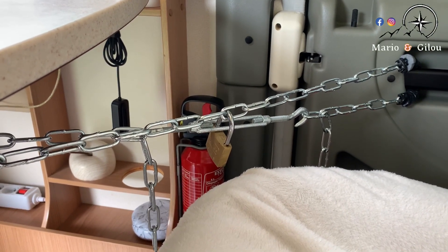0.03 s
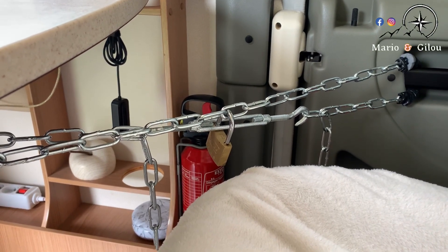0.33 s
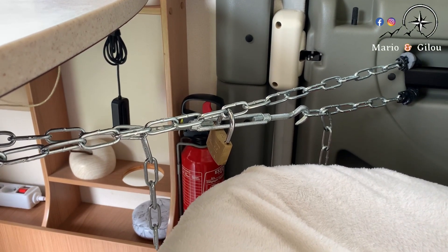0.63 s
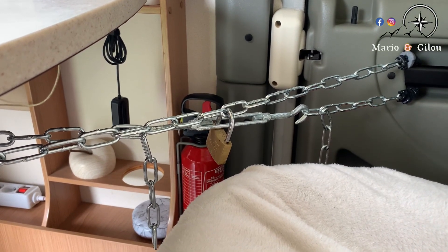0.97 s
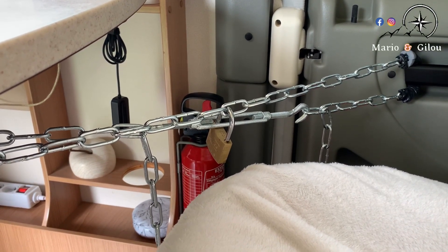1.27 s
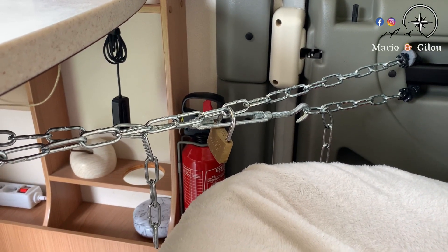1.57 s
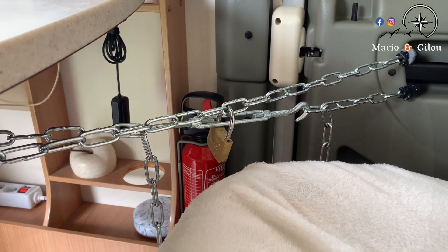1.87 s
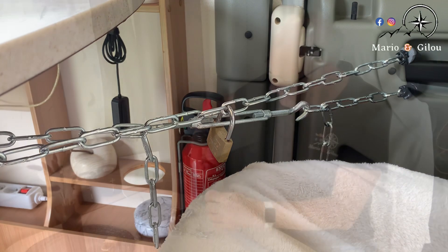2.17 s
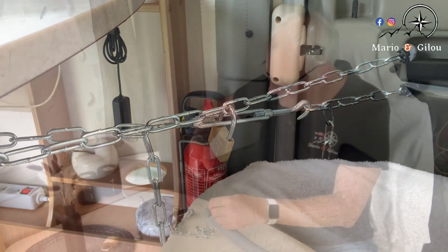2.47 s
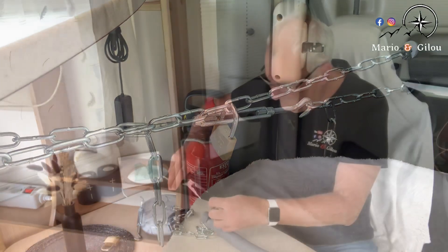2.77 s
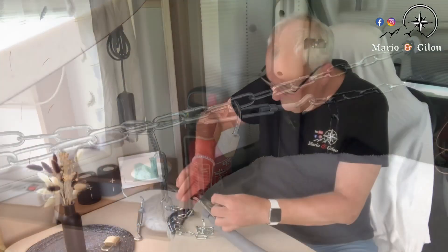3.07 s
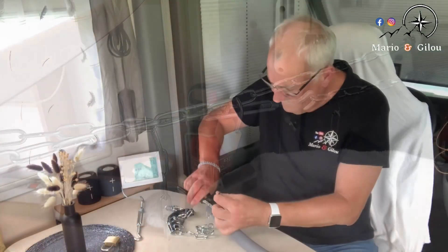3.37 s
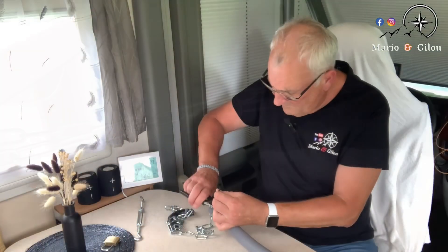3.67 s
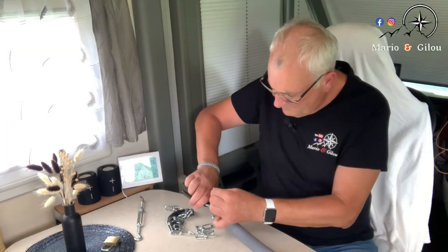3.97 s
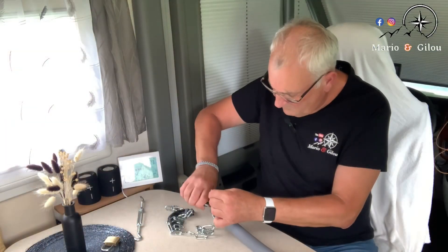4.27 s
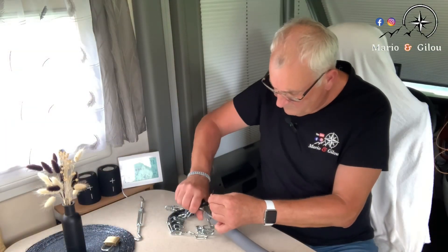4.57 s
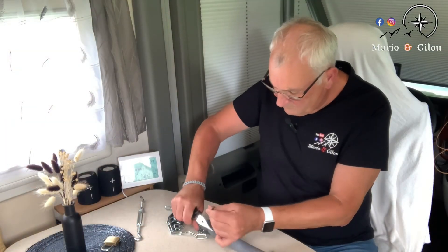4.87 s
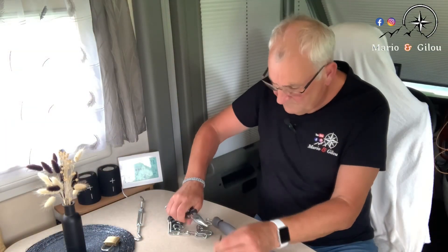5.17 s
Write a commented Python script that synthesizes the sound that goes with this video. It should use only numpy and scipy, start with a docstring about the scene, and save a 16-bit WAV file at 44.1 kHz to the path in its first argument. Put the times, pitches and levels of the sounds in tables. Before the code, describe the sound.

Steel chain links clatter and drag on a table in a small camper van, settle to light taps, then clatter again as pliers click.

```python
"""A heap of steel chain is picked over on a table in a small camper van with a short, dense echo.
At first there is only faint rumble and hiss. Near 1.9 s the heap shifts: links knock on the tabletop,
clink together and drag. From about 3 s the knocks are softer and hands rub gently over the work.
Pliers click a few times from 3.9 s, loudest near 4.9 s, as the heap shifts again and clatters to the end."""
import sys
import numpy as np
from scipy import signal
from scipy.fft import rfft, irfft
from scipy.io import wavfile

SR = 44100
rng = np.random.default_rng(int(sys.argv[2]) if len(sys.argv) > 2 else 0)


def inscribe(sig):
    """Save sig as 16-bit PCM at rate SR to the path in sys.argv[1].

    A 1-D sig is mono; a 2-D sig holds one channel per row.
    Samples are clipped to [-1, 1] before scaling.
    """
    pcm = np.round(np.clip(np.atleast_2d(sig).T, -1, 1) * 32767)
    wavfile.write(sys.argv[1], SR, pcm.astype(np.int16))


N = 234215

# a link lands on the table: (time [s], relative clack level [dB], relative thud level [dB])
LANDINGS = [(1.8626, -23.5, -27), (1.971, -32, -39.5), (1.9808, -20.5, -32.5), (1.9913, -17.5, -24),
            (2.0304, -34, -31.5), (2.0449, -19, -27.5), (2.1041, -21, -23), (2.121, -21.5, -27.5),
            (2.141, -22.5, -26), (2.1979, -30, -32.5), (2.2496, -13.5, -23), (2.267, -14.5, -19.5),
            (2.3603, -20, -28), (2.3827, -35, -33.5), (2.4166, -25.5, -33.5), (2.427, -16.5, -19),
            (2.4325, -14.5, -29.5), (2.4736, -24, -29), (2.5162, -19.5, -24), (2.5548, -33, -37.5),
            (2.5629, -25.5, -30), (2.5996, -44, -45), (2.6301, -41, -42.5), (2.7276, -34, -28.5),
            (2.7393, -17, -20.5), (2.8465, -35.5, -40.5), (2.8571, -37, -39.5), (2.9838, -37, -38),
            (3.0409, -31.5, -35.5), (3.0644, -37.5, -39.5), (3.1228, -34, -36), (3.1714, -42.5, -42),
            (3.245, -48, -52.5), (3.287, -36.5, -41), (3.3402, -48, -37.5), (3.41, -48, -47.5),
            (3.5414, -42.5, -43), (3.5578, -37, -39.5), (3.582, -40.5, -44), (3.6696, -52, -54),
            (3.7259, -48, -50), (3.9, -43, -37.5), (3.9656, -29.5, -36), (3.9932, -36.5, -46),
            (4.0703, -47, -47.5), (4.1306, -38, -41.5), (4.2004, -71, -47), (4.2267, -35.5, -36.5),
            (4.3101, -48, -51), (4.3211, -52, -39.5), (4.3358, -43.5, -41.5), (4.3919, -38.5, -49),
            (4.4247, -41.5, -44.5), (4.4653, -42.5, -42.5), (4.56, -37.5, -34.5), (4.7532, -25.5, -34.5),
            (4.791, -30, -34), (4.9077, -27, -29.5), (4.9302, -18, -25), (4.9408, -28, -25),
            (4.9608, -26.5, -30), (4.9774, -14.5, -24), (5.0, -20.5, -26), (5.0174, -17, -24),
            (5.053, -20, -22.5), (5.084, -19, -26), (5.1022, -24, -35), (5.1236, -27, -28),
            (5.1412, -14.5, -31), (5.1454, -27, -19), (5.2008, -28, -29), (5.218, -29, -31.5),
            (5.2688, -30.5, -33.5)]
# the tones of the struck tabletop and of a bending link: (pitch [Hz], width [Hz], relative level [dB])
TABLE_TONES = [(126, 14, -21.5), (287.4, 31, -0.5), (398.8, 42, 0.5), (503, 85, -7.5), (617, 142, 0.5),
               (692, 45, -4.5), (835, 64, -1), (990, 100, -9), (1120, 66, -16), (1272, 37.4, -4),
               (1450, 18, -19), (1526, 35, -21.5), (1770, 69, -24)]
LINK_TONES = [(2616, 300, -15.5), (2930, 230, -14), (3150, 160, 2.5), (3274, 150, 3.5), (3520, 110, 0),
              (3680, 110, -21)]
# bursts of clinks: (start [s], length [s], relative lower ring level [dB], upper ring versus lower [dB])
JINGLE_RUNS = [(1.861, .02, -32.5, -6), (1.972, 0.0041, -29, -4), (1.984, 0.037, -17.5, -11),
               (2.117, 0.055, -23, -6), (2.272, 0.14, -32, -4), (2.42, 0.0045, -30.5, -14),
               (2.431, 0.022, -18, -9), (2.521, 0.071, -31.5, -9), (2.625, .005, -32, -8),
               (2.73, 0.12, -30, -9), (2.981, .005, -44.5, -8), (3.041, 0.032, -30.5, -13),
               (3.155, 0.018, -33.5, -7), (3.287, 0.051, -41, -2), (3.552, .02, -36.5, 3),
               (3.67, 0.0041, -48.5, -11.5), (3.968, 0.027, -43, 3), (4.120, .005, -50, 8.5),
               (4.756, 0.047, -32.5, 1.5), (4.909, 0.071, -18.5, -13), (4.999, 0.033, -14, -12),
               (5.056, 0.081, -25, -7), (5.129, 0.049, -21, -7), (5.214, .005, -30.5, -9),
               (5.264, .02, -33.5, -4)]
# a link's two groups of very high tones: (pitch [Hz], relative level [dB], free time to fade 60 dB [s])
LOWER_RING_TONES = [(10599, 2, .12), (10648, -2, .085), (10694, 0, .09), (10810, -3, .11),
                    (10880, -13, .05)]
UPPER_RING_TONES = [(12010, -5, .06), (12070, 1, .14), (12400, -5, .025), (12715, -5, .07), (12797, -2, .1)]
# how hard the links drag, one list for each shift of the heap: (time [s], relative level [dB])
DRAG_CURVES = [
    [(1.9, -75), (1.946, -71), (2.074, -50), (2.186, -48), (2.404, -43.5), (2.542, -44), (2.642, -53),
     (2.78, -47), (2.9, -54)],
    [(4.76, -47), (4.846, -55), (4.98, -43), (5.064, -41.5), (5.202, -52.5), (5.31, -46)],
]
# the pliers click: (time [s], peak level [dB], boost of the low tones [dB])
PLIER_CLICKS = [(3.9, -33, 24), (4.56, -25, 20), (4.6765, -23.5, -10), (4.7003, -38, -12),
                (4.8855, -37, -10), (4.8908, -10.5, 3)]
# the low and the high tones of the pliers: (pitch [Hz], width [Hz], relative level [dB])
PLIER_LOW_TONES = [(1720, 240, 0), (3300, 600, -11), (5000, 700, -7)]
PLIER_HIGH_TONES = [(5700, 630, -20.5), (7000, 720, -4.5), (10500, 850, -27), (11800, 1600, -11),
                    (14900, 780, -27)]
# how hard the hands rub: (time [s], relative level [dB])
RUB_CURVE = [(2.9, -65), (3.058, -64), (3.218, -51.5), (3.378, -56.5), (3.5, -67), (3.632, -64),
             (3.952, -56.5), (4.134, -52.5), (4.266, -59), (4.388, -51.5), (4.52, -75.5), (4.686, -87),
             (4.818, -55.5), (4.88, -57)]
# the tone colour of the still cabin air: (frequency [Hz], relative level [dB])
AIR_COLOUR = [(12, -47), (20, -3.5), (138, -7.5), (168, -2), (262, -10), (337, -4), (367, -10), (485, -8.5),
              (527, -11), (678, -12.5), (949, -17.5), (14300, -29), (16000, -27)]

THUD_BAND_HZ, CRACK_BAND_HZ = (290, 4500), (4730, 5000)   # where the bass cut and the treble cut set in
THUD_TRIM_DB, CLACK_TRIM_DB, CRACK_TRIM_DB = -4.5, -13.5, -12.5
HARD_LANDING_DB = -11.5   # a clack level in LANDINGS that counts as a hard landing
CRACK_LOSS, ECHO_LOSS = 0.25, 0.045   # extra dB lost for each dB that a landing is softer than that
CLINK_GAP_S, CLINK_GAP_SPREAD = 0.016, 0.23   # average time between clinks; the share it may vary by
JINGLE_FADE_DB, RING_SPREAD_DB = 4.5, 6.5   # fade over one jingle; how much each ringing tone varies
AGE = np.arange(int(.25 * SR)) / SR   # seconds since a hit


def knocks():
    """A landing link thuds the table, bends with a clack and cracks where it hits; soft hits are duller."""
    out = np.zeros(N)
    for s, clack_db, thud_db in LANDINGS:
        softer_db = HARD_LANDING_DB - clack_db
        crack_db = clack_db + CRACK_TRIM_DB - CRACK_LOSS * softer_db
        drier_db = ECHO_LOSS * softer_db   # a soft landing stirs fewer neighbours
        on_table = impact(near_db=-0.5 - drier_db, near_s=0.048, echo_db=1.5 - drier_db, echo_s=0.14)
        on_link = impact(near_db=2.0 - drier_db, near_s=0.024, echo_db=4.5 - drier_db, echo_s=0.16)
        on_contact = impact(near_db=7.5 - drier_db, near_s=0.016, echo_db=8.5 - drier_db, echo_s=0.12)
        tabletop = resonate(on_table, TABLE_TONES, spread_db=1.5)
        flex = from_db(-1) * band(tabletop, (40, 110))   # the whole top bends only a little
        thud = band(tabletop, THUD_BAND_HZ) + flex
        clack = band(resonate(on_link, LINK_TONES, spread_db=1.5), (1000, 9000))
        add(out, s, from_db(thud_db + THUD_TRIM_DB) * unit_attack(thud))
        add(out, s, from_db(clack_db + CLACK_TRIM_DB) * unit_attack(clack))
        add(out, s, from_db(crack_db) * unit_attack(band(on_contact, CRACK_BAND_HZ)))
    return out


def clinks():
    """Steel rings on steel; hard hits press the links together, which cuts the ringing short."""
    out = np.zeros(N)
    for s, lower_db, upper_db in jingles(max_clinks=10):
        grip = 1 + from_db(lower_db + 13)
        lower = link_ring(LOWER_RING_TONES, grip, detune_hz=8)
        upper = link_ring(UPPER_RING_TONES, grip, detune_hz=8)
        add(out, s, from_db(lower_db + 22) * lower)
        add(out, s, from_db(upper_db + 23) * upper)
    return out


def jingles(max_clinks):
    """Disturbed chain gives uneven, fading runs of clinks: (time [s], lower ring [dB], upper ring [dB])."""
    rows = []
    for start, length, lower_db, upper_db in JINGLE_RUNS:
        gaps = CLINK_GAP_S * (1 + CLINK_GAP_SPREAD * rng.uniform(-1, 1, max_clinks))
        delays = np.cumsum(gaps) - gaps[0]
        for delay in delays[delays < length]:
            clink_db = lower_db - JINGLE_FADE_DB * delay / length
            rows.append((start + delay, clink_db, clink_db + upper_db))
    return rows


def link_ring(tones, grip, detune_hz):
    """Tones close in pitch make a link shimmer; the tighter its neighbours grip, the sooner it fades."""
    hz, db, fade_s = np.transpose(tones)[:, :, None]
    strength, detune = rng.standard_normal((2, len(tones), 1))   # no two clinks are quite alike
    fade = from_db(db + RING_SPREAD_DB * strength - 60 * AGE * grip / fade_s)
    ring = np.sum(fade * np.sin(2 * np.pi * (hz + detune_hz * detune) * AGE), axis=0)
    chatter = impact(near_db=3.5, near_s=0.06, echo_db=-1, echo_s=0.15)
    return unit_energy(signal.fftconvolve(ring, chatter)[:len(AGE)])


def pliers():
    """A steel tool held in the hand gives short, dry clicks."""
    out = np.zeros(N)
    for s, peak_db, low_db in PLIER_CLICKS:
        force = impact(near_db=17.5, near_s=0.0055, echo_db=10.5, echo_s=0.076)
        click = resonate(force, PLIER_HIGH_TONES) + from_db(low_db) * resonate(force, PLIER_LOW_TONES)
        add(out, s, from_db(peak_db) * click / np.abs(click).max())
    return out


def drag(touches_per_s):
    """As the heap shifts, many tiny touches of uneven size blur into a scrape."""
    sizes = from_db(4 * np.minimum(rng.exponential(1, N), 3)) * rng.choice([-1, 1], N)
    touches = sizes * (rng.random(N) < touches_per_s / SR)
    one_touch = impact(near_db=-2, near_s=0.025, echo_db=-1, echo_s=0.14)
    force = signal.fftconvolve(touches, one_touch)[:N]
    thud = unit_level(band(resonate(force, TABLE_TONES), THUD_BAND_HZ))
    clack = unit_level(resonate(force, LINK_TONES))
    crack = unit_level(band(force, CRACK_BAND_HZ))
    effort = sum(level_in_time(curve) for curve in DRAG_CURVES)
    return effort * (from_db(-3) * thud + from_db(-14.5) * clack + from_db(-9) * crack)


def rubbing_hands():
    """Sliding skin gives a dull, soft rustle."""
    rustle = resonate(rng.standard_normal(N), [(950, 500, 0), (1500, 700, -5)])
    return from_db(-5) * level_in_time(RUB_CURVE) * unit_level(band(rustle, (450, 3500)))


def cabin_air(level_db):
    """The still cabin has a faint, steady rumble and hiss."""
    hz, db = np.transpose(AIR_COLOUR)
    all_hz = np.maximum(np.fft.rfftfreq(N, 1 / SR), 1)
    colour = from_db(np.interp(np.log(all_hz), np.log(hz), db))
    noise = irfft(rfft(rng.standard_normal(N)) * colour, N)
    return from_db(level_db) * unit_level(noise)


def impact(near_db, near_s, echo_db, echo_s):
    """One hit: a click, a quick scatter off nearby links and surfaces, then the cabin's echo."""
    force = from_db(near_db) * unit_energy(dying_noise(near_s))
    build_up = 1 - np.exp(-AGE / 0.002)
    force += from_db(echo_db) * unit_energy(dying_noise(echo_s) * build_up)
    force[0] += 1   # the click itself
    return force


def resonate(force, tones, spread_db=0):
    """A struck object rings at its own tones; spread_db varies their strength, as the spot hit would."""
    out = 0
    for hz, width, db in tones:
        r = np.exp(-np.pi * width / SR)   # share of the ring left after one sample: wide tones die fast
        feedback = [1, -2 * r * np.cos(2 * np.pi * hz / SR), r * r]
        tone = signal.lfilter([1, 0, -1], feedback, force + 1e-18)
        strength = from_db(db + spread_db * rng.standard_normal())
        out = out + (1 - r * r) / 2 * strength * tone
    return out


def dying_noise(fade_s):
    """A puff of noise that falls by 60 dB in fade_s seconds."""
    return rng.standard_normal(len(AGE)) * from_db(-60 * AGE / fade_s)


def band(x, edges_hz):
    """Cut the sound steeply below the first edge and gently above the second."""
    low_cut = signal.butter(3, edges_hz[0], "high", fs=SR, output="sos")
    high_cut = signal.butter(1, edges_hz[1], fs=SR, output="sos")
    return signal.sosfilt(np.vstack([low_cut, high_cut]), x + 1e-18)


def level_in_time(curve):
    """A volume that follows (time [s], level [dB]) points and is silent outside them."""
    s, db = np.transpose(curve)
    return from_db(np.interp(np.arange(N) / SR, s, db, left=-120, right=-120))


def from_db(db):
    """Turn decibels into a number to multiply by."""
    return 10 ** (np.asarray(db) / 20)


def unit_level(x):
    """Scale to an average (rms) level of 1."""
    return x / np.sqrt(np.mean(x ** 2) + 1e-20)


def unit_energy(x):
    """Scale to a total energy of 1."""
    return x / np.sqrt(np.sum(x ** 2) + 1e-20)


def unit_attack(x):
    """Scale so that the first 20 ms have an average (rms) level of 1."""
    return x / np.sqrt(np.mean(x[:SR // 50] ** 2) + 1e-20)


def add(out, s, sound):
    """Mix a sound in at s seconds."""
    start = int(np.clip(round(s * SR), 0, N - 1))
    out[start:start + len(sound)] += sound[:N - start]


def scene():
    """The chain, the pliers and the hands in the quiet cabin, as one channel."""
    handling = knocks() + clinks() + pliers() + drag(touches_per_s=200) + rubbing_hands()
    return (handling + cabin_air(level_db=-66.5))[None]


def record(dry):
    """The very highest treble, above 15900 Hz, is cut steeply."""
    return signal.sosfilt(signal.ellip(10, .1, 70, 15900, fs=SR, output="sos"), dry)


dry = scene()
out = record(dry)
inscribe(out)
```